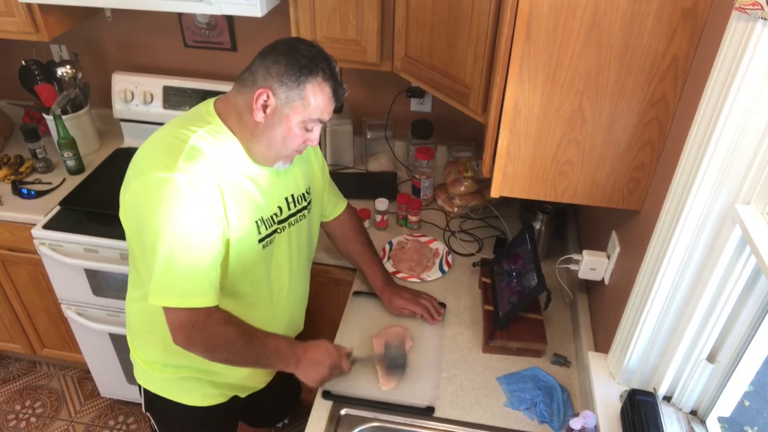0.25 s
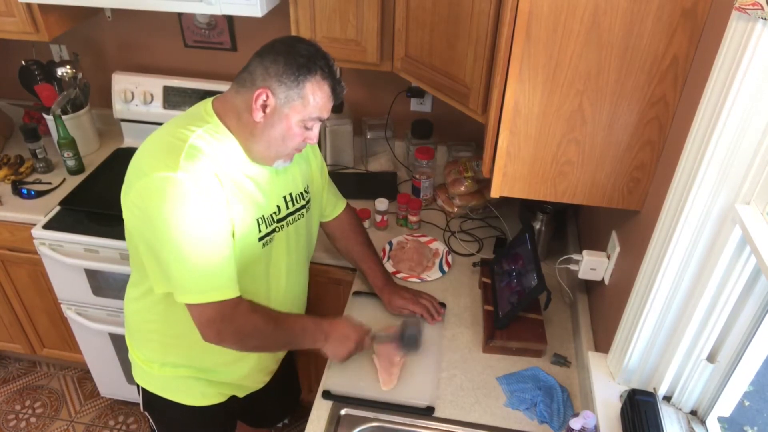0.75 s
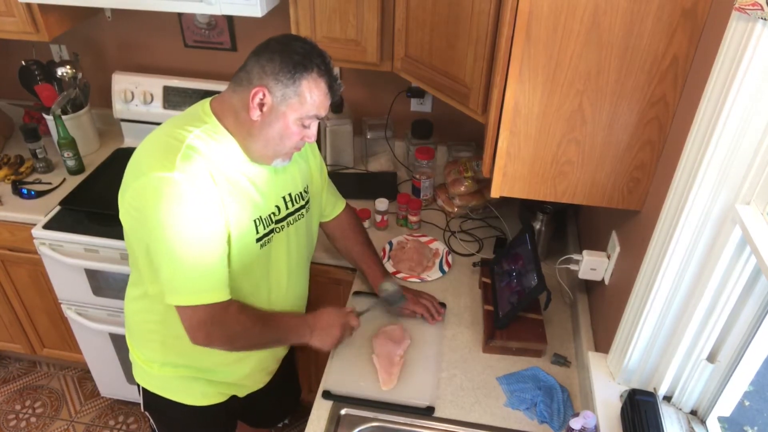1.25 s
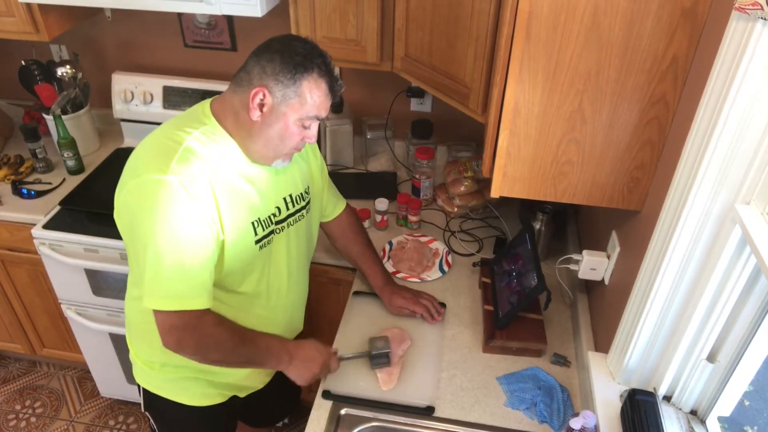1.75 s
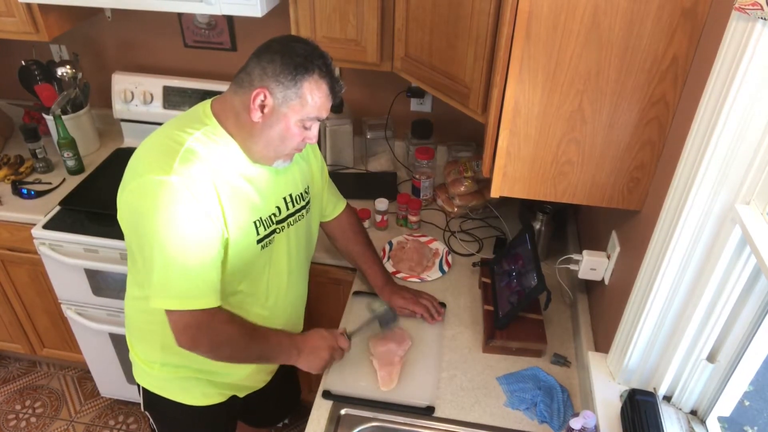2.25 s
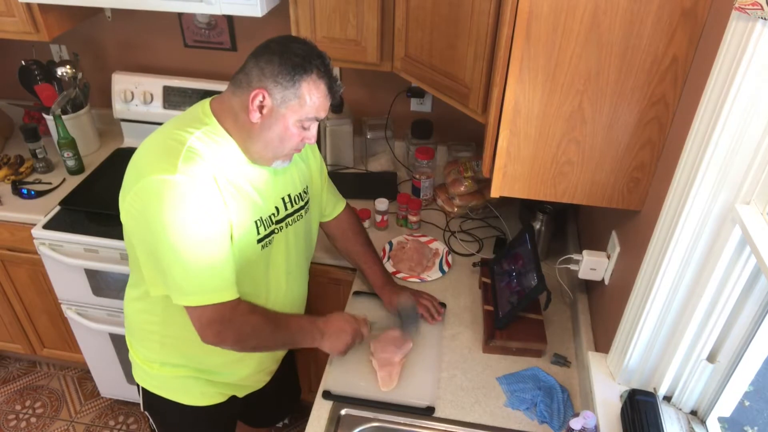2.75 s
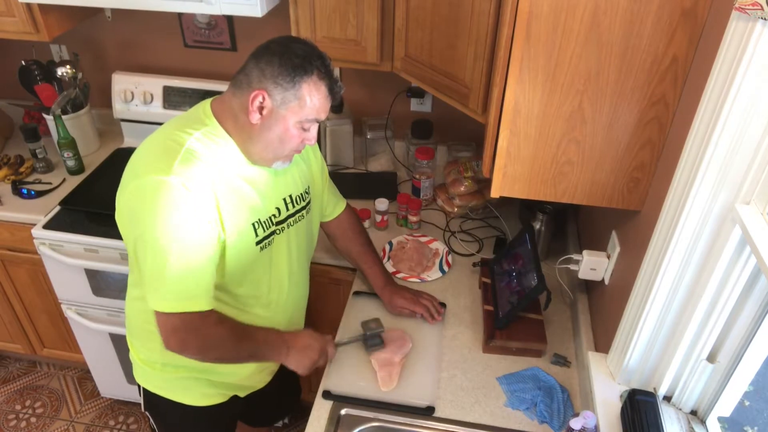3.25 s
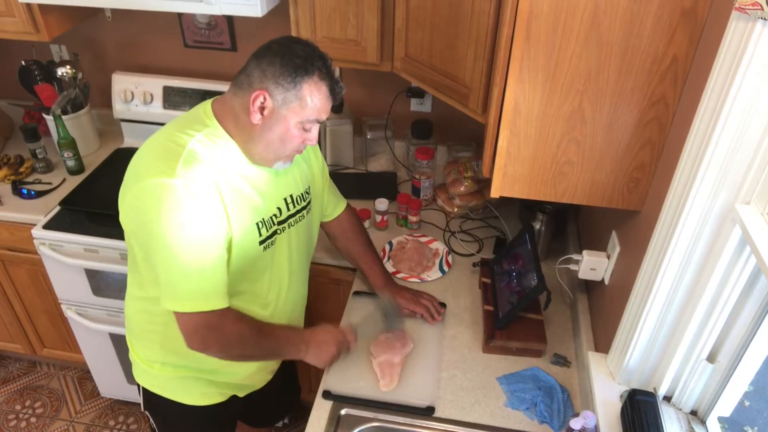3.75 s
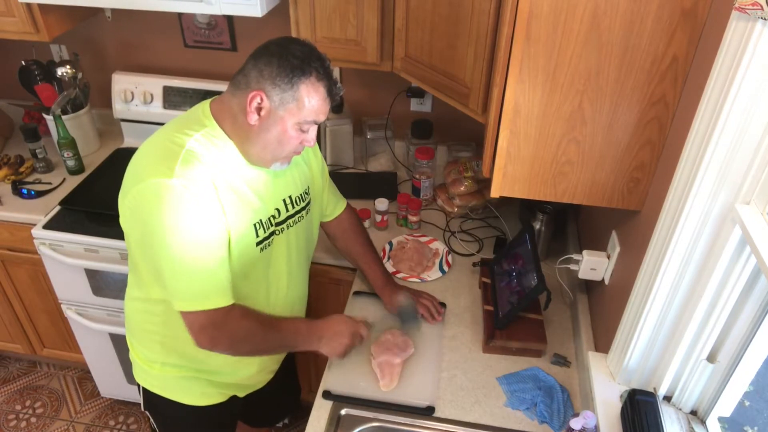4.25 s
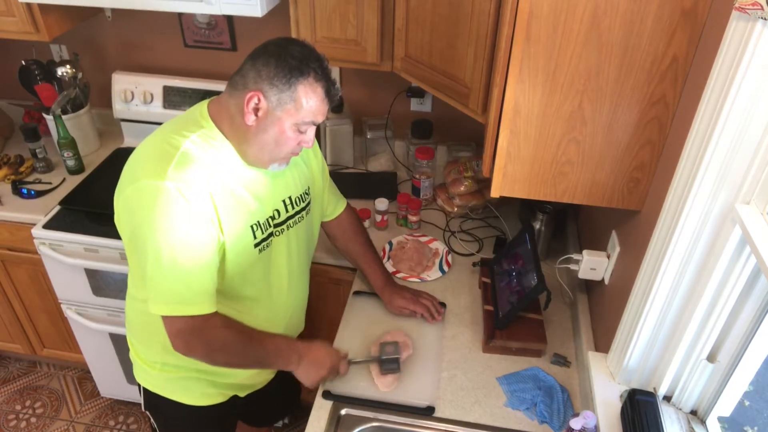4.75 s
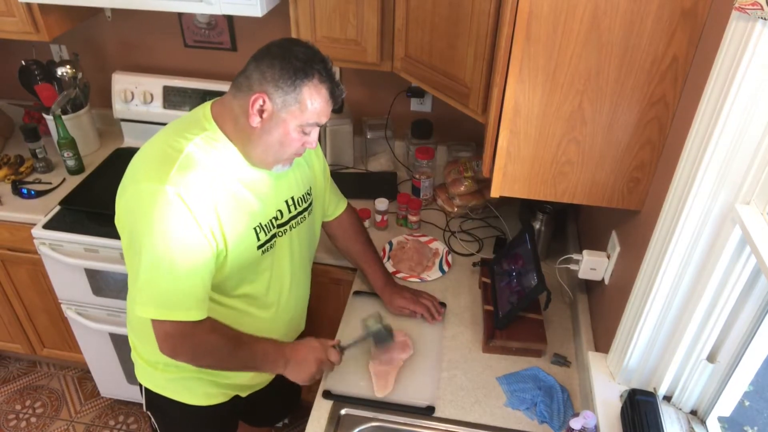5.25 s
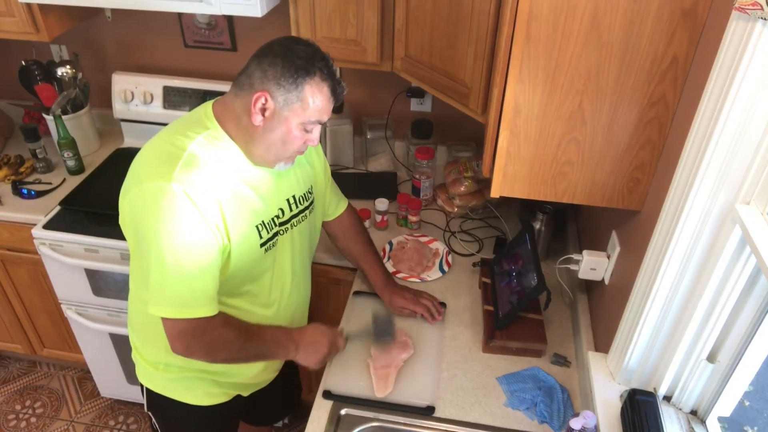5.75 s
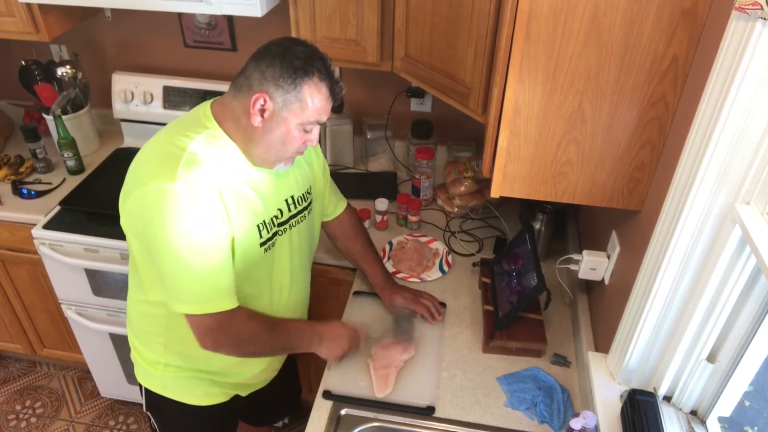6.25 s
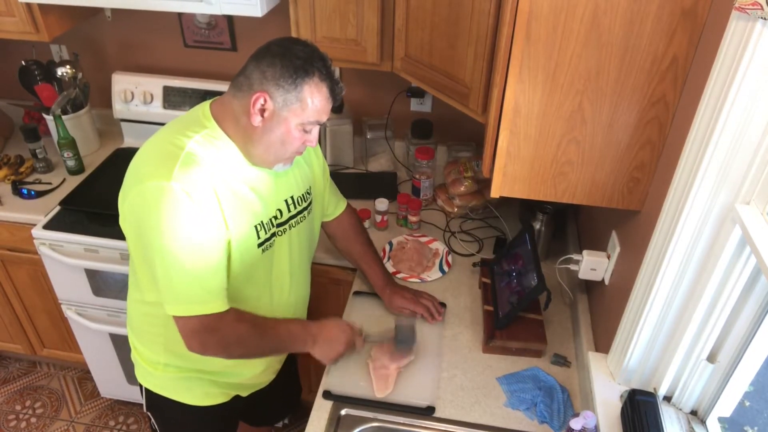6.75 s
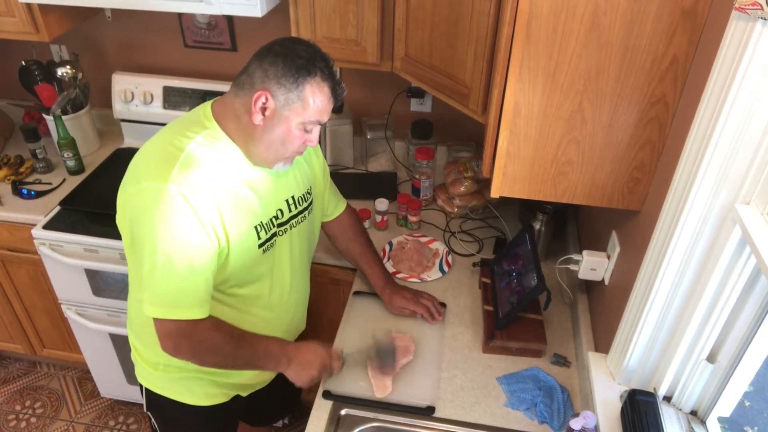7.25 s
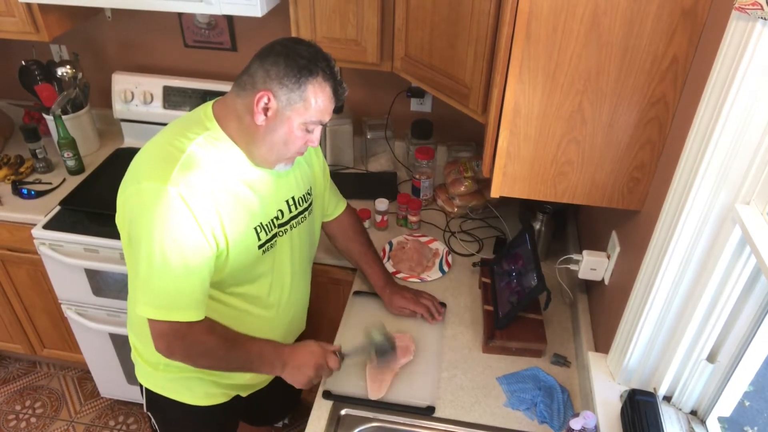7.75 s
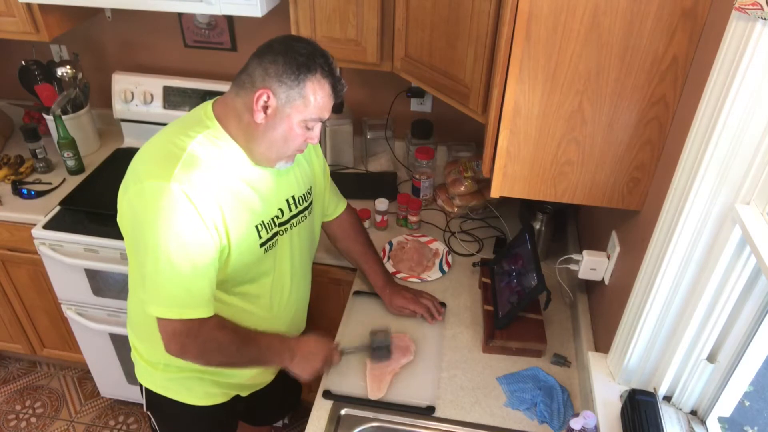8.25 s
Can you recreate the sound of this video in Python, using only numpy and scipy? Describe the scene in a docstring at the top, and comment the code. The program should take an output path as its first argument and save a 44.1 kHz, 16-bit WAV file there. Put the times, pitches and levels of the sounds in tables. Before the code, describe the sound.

A metal mallet pounds raw chicken on a plastic cutting board, about five blows a second without a pause. Each blow joins a brief wet squelch with a sharp slap, a knock from the board and a low thud from the counter and hollow cabinet. The blows vary in wetness and soften a little near the end. The microphone is close, and the small kitchen rings briefly.

```python
"""Pounding chicken in a small kitchen.

Close to the microphone, a metal mallet pounds a chicken breast on a plastic cutting board, about five
blows a second. Each blow squelches as the face meets the wet meat, then slaps home: the board knocks,
the counter thuds and the cabinet under it answers. The room rings briefly after every blow, and the
peaks drive the microphone to its ceiling."""
import sys
import numpy as np
from scipy import signal
from scipy.fft import rfft, irfft, next_fast_len
from scipy.io import wavfile

SR = 44100
rng = np.random.default_rng(int(sys.argv[2]) if len(sys.argv) > 2 else 0)


def wav_record(signal):
    """Record a signal, one row per channel, as 16-bit PCM in the file named by sys.argv[1]."""
    frames = np.transpose(np.atleast_2d(signal))
    bounded = np.clip(frames, -1, 1)
    # unit amplitude maps onto the largest positive 16-bit level
    quanta = np.round(bounded * 32767).astype(np.int16)
    wavfile.write(sys.argv[1], SR, quanta)


N = 374850
SIZE = 32768  # samples in one blow and its tail
T = np.arange(SIZE) / SR


def undb(db):
    """Decibels to gain."""
    return 10 ** (np.asarray(db) / 20)


def fade(t60):
    """Exponential decay that loses 60 dB in t60 seconds."""
    return np.exp(-np.log(1000) * T / t60)


def swell(rise_s):
    """Exponential rise from 0 towards 1."""
    return 1 - np.exp(-T / rise_s)


def unit(x):
    """Scale to unit energy."""
    return x / np.sqrt(np.sum(x ** 2))


def level(x, db):
    """Set the rms of the first 50 ms."""
    return x * undb(db) / np.sqrt(np.mean(x[:SR // 20] ** 2))


def colour(x, spectrum):
    """Minimum-phase filter with the outline (frequency [Hz], level [dB])."""
    size = 2 * next_fast_len(len(x))
    hz, db = np.transpose(spectrum)
    bins = np.maximum(np.fft.rfftfreq(size, 1 / SR), 1)
    gain = undb(np.interp(np.log(bins), np.log(hz), db))
    cepstrum = irfft(np.log(gain))
    cepstrum[1:size // 2] *= 2
    cepstrum[size // 2 + 1:] = 0
    return irfft(rfft(x, size) * np.exp(rfft(cepstrum)))[:len(x)]


def cut(x, hz, kind, order=2):
    """Butterworth low-pass or high-pass."""
    return signal.sosfilt(signal.butter(order, hz, kind, fs=SR, output="sos"), x)


def add(track, s, x):
    """Mix a sound into the track at time s."""
    start = int(round(s * SR))
    a, b = max(start, 0), min(start + len(x), len(track))
    track[a:b] += x[a - start:b - start]


def crackle(grain_db, size=16):
    """Noise in tiny grains of uneven strength, each size samples long."""
    noise = rng.standard_normal(SIZE)
    grains = undb(grain_db * rng.standard_normal(SIZE // size))
    return noise * np.repeat(grains, size)


def ring(modes, scatter_db, detune, gains=1):
    """Struck modes, neighbours in opposite phase; strength and pitch shift from blow to blow."""
    t = T[:SIZE // 2]
    hz, db, t60 = np.transpose(modes)[:, :, None]
    hz = hz * (1 + detune * rng.standard_normal(hz.shape))
    db = db + scatter_db * rng.standard_normal(db.shape)
    waves = undb(db) * np.sin(2 * np.pi * hz * t) * np.exp(-np.log(1000) * t / t60)
    signs = (-1) ** np.arange(len(modes))
    return np.pad((gains * signs) @ waves, (0, SIZE // 2))


# Room tone at the microphone: (frequency [Hz], level [dB])
ROOM_TONE = [(25, 1), (60, 22), (150, -5), (500, -8), (2000, -14), (8000, -36), (16000, -65)]
def room_tone(db=-52):
    """Faint steady hush of the house."""
    hush = colour(rng.standard_normal(N), ROOM_TONE)
    return hush * undb(db) / np.std(hush)


# Reverberation of the small kitchen: (frequency [Hz], t60 [s])
KITCHEN_DECAY = [(100, 0.21), (400, 0.48), (1100, 0.46), (3000, 0.44), (6500, 0.44), (10000, 0.39),
                 (15000, 0.33)]
def kitchen(walls, moving_share=0.64, near_db=-2, late_db=2, dull_hz=11000):
    """Echoes of a click: quick ones off the nearby wall and cupboards, then the diffuse room."""
    near = rng.standard_normal(SIZE) * (rng.random(SIZE) < .15) * fade(t60=.12) * (T > .0015)
    # The walls' pattern is given; clumps of echoes off the moving arm and body are new each time.
    echoes = rfft(walls + moving_share * crackle(grain_db=3, size=128))
    hz, t60 = np.transpose(KITCHEN_DECAY)
    log_bins = np.log(np.maximum(np.fft.rfftfreq(SIZE, 1 / SR), 1))
    bands = [np.interp(log_bins, np.log(hz), share) for share in np.eye(len(hz))]
    late = sum(irfft(echoes * band) * fade(t) for band, t in zip(bands, t60))
    late = cut(unit(late * swell(rise_s=.0072)), dull_hz, "low")
    return undb(near_db) * unit(near) + undb(late_db) * late


def in_room(x, room, room_db):
    """The direct sound together with its echoes."""
    return x + undb(room_db) * signal.fftconvolve(x, room)[:SIZE]


# Standing waves between the kitchen walls: (frequency [Hz], level [dB], t60 [s])
ROOM_MODES = [(51.6, 0.5, 0.3), (72.5, -8, 0.56), (96.3, 4, 0.23), (161.8, -0.5, 0.42), (975, -8.5, 0.41)]
def standing_waves():
    """The room's own notes build up late and linger."""
    return ring(ROOM_MODES, scatter_db=2.5, detune=.01) * swell(rise_s=.036)


# Cabinet panels below the counter: (frequency [Hz], level [dB], t60 [s])
CABINET_MODES = [(312.7, -0.5, 0.16), (345, 8, 0.087), (384, -8.5, 0.27), (424.2, -8, 0.21),
                 (440.4, -6.5, 0.19), (459.4, -3.5, 0.23), (539, -10, 0.25), (586.6, -0.5, 0.13),
                 (695, 9.5, 0.064), (734, -7.5, 0.22)]
def cabinet():
    """A blow shakes the hollow cabinet, which takes a moment to answer."""
    return ring(CABINET_MODES, scatter_db=3, detune=.028) * swell(rise_s=.039)


# Counter top under the board: (frequency [Hz], level [dB], t60 [s])
COUNTER_MODES = [(68.5, -10, 0.25), (87.5, 3, 0.059), (122.5, 0, 0.17), (160, 3.5, 0.06),
                 (200.5, -3.5, 0.56), (240, -0.5, .10), (279.8, -8, 0.17)]
def counter_thud(room, press_s=0.06, release_s=0.017, lifted_db=-15):
    """The counter booms while the mallet bears on it, and quietens as the mallet lifts."""
    lifted = np.clip((T - press_s) / release_s, 0, 1)
    boom = ring(COUNTER_MODES, scatter_db=1.5, detune=.011) * swell(rise_s=.0025)
    return in_room(boom * undb(lifted_db * lifted), room, room_db=-11)


# Cutting board and mallet, close up: (frequency [Hz], level [dB], t60 [s])
BOARD_MODES = [(873, -5.5, 0.21), (1070, -17, 0.027), (1050.6, -3, 0.23), (1097, -0.5, 0.11),
               (1203, -0.5, 0.07), (1348, 1, 0.026), (1447, 1, 0.13), (1500, 1, 0.037), (1608, -11, 0.13),
               (1760, -20, 0.42)]
def board_knock(room, centre_hz, spread_hz=280, echo_s=.008, echo_db=-3):
    """Where the mallet lands picks the board's modes, and the meat damps them."""
    mode_hz = np.transpose(BOARD_MODES)[0]
    gains = 1 / (1 + ((mode_hz - centre_hz) / spread_hz) ** 2)
    board = ring(BOARD_MODES, scatter_db=2, detune=.012, gains=gains) * fade(t60=.085)
    out = in_room(board, room, room_db=-15)
    add(out, echo_s * rng.uniform(.7, 1.3), undb(echo_db) * board)  # off the cupboard overhead
    return out


# Wet meat, close up: (frequency [Hz], level [dB])
SQUELCH_SPECTRUM = [(300, 10), (1500, 8.5), (4000, 9), (7000, 10.5), (10400, -2.5), (13000, 2), (16000, -3)]
def squelch(sink_s, after_s=.002, touch_db=-6, room_db=-11):
    """Wet crackle that grows while the mallet's teeth sink in and dies once they bottom out."""
    sunk = np.minimum(T / sink_s, 1)
    squeeze = undb(touch_db * (1 - sunk)) * np.exp(-np.maximum(T - sink_s, 0) / after_s)
    # The squelch trails off in a faint, diffuse wash of room echo.
    echoes = kitchen(rng.standard_normal(SIZE)) * sunk ** 2
    juice = unit(crackle(grain_db=2.5) * squeeze)
    x = colour(juice + undb(room_db) * echoes, SQUELCH_SPECTRUM)
    return x / np.sqrt(np.mean(x[T < sink_s + after_s] ** 2))


# The slap at the microphone: (frequency [Hz], level [dB])
SLAP_SPECTRUM = [(60, -24), (250, 0.5), (420, 3.5), (600, -2), (850, 3.5), (1100, 6), (1500, 3.5),
                 (2100, -2), (4000, -3.5), (5000, -7), (6700, -9), (8500, -18.5), (10400, -23.5),
                 (12500, -19), (15500, -20.5)]
def slap(room, lowest_hz=650, room_db=-3):
    """Air and juice burst from under the teeth: a grainy crack that gets its body from the room."""
    burst = crackle(grain_db=1) * fade(t60=.067) * swell(rise_s=.00057)
    crack = cut(burst, lowest_hz, "high")
    return colour(unit(crack) + undb(room_db) * room, SLAP_SPECTRUM)


# Wetness of the meat as the mallet wanders over the breast: (time [s], level [dB])
WETNESS = [(0, -10.5), (.35, -18), (.65, 0.5), (1.1, -3.5), (1.4, 6.5), (1.65, -5.5), (2.1, -2),
           (3.1, -0.5), (3.45, -6), (3.9, 1), (4.4, -2), (5.1, -8), (5.65, 1.5), (6.9, -1), (7.55, -17),
           (7.9, -3), (8.2, 4)]
# The counter's boom as the mallet works across the board: (time [s], level [dB])
BOOM = [(0, 0), (.45, 3), (1.1, 0), (2.4, -.5), (3.9, -1), (4.4, 1), (5.05, 2.5), (5.4, -1), (6.1, -1),
        (6.75, 3.5), (7.2, 1), (8.4, 0)]
# Mallet strokes: (landing time [s], force [dB], knock level relative to the blow [dB], knock centre [Hz])
STROKES = [(-0.085, -3.5, 9, 1190), (0.085, -2, 5.5, 1145), (0.2522, 1.5, 3, 1220), (0.4157, 1.5, 0, 1350),
           (0.577, 0.5, -0.5, 1240), (0.752, 2, -0.5, 1120), (0.961, 0.5, -0.5, 1410), (1.1788, 1, 3, 1260),
           (1.383, -1, 5.5, 1170), (1.5898, 2, -0.5, 1050), (1.7882, -1.5, 1, 1140), (1.98, 0, 5.5, 1190),
           (2.1715, -0.5, 0.5, 1220), (2.351, -2.5, 2, 1230), (2.532, 3, -0.5, 1160),
           (2.7271, 3.5, -3.5, 1370), (2.9121, 0.5, -6, 1210), (3.0993, 1.5, 0.0, 1200),
           (3.285, 2, 0, 1300), (3.4679, 0.5, 5, 1280), (3.6577, -1.5, -2.5, 1220),
           (3.8389, 2.5, 0.5, 1230), (4.0277, 3.5, -2, 1240), (4.2216, 3.5, -3.5, 1110),
           (4.4162, 0, 4, 1090), (4.608, -1, -0.5, 1100), (4.8, 1, 4, 1380), (4.997, -2.5, 5, 1390),
           (5.1945, -1, 2, 1210), (5.382, -1, -0.5, 1160), (5.5709, 0.5, -2, 1290), (5.749, 2, -2.5, 1080),
           (5.9374, -0.5, -18, 1250), (6.1237, 1.5, 3, 1240), (6.3326, 2.5, 3, 1070),
           (6.5385, -1.5, -15, 1140), (6.7375, 1, -5, 1450), (6.9433, -0.5, 1.5, 1320),
           (7.1443, -3.5, 2.0, 1390), (7.3351, -1.5, 0.5, 1260), (7.5318, -7.5, -1, 1220),
           (7.7172, -4, -3, 1250), (7.9132, -2.5, 4, 1350), (8.0937, -3, -1, 1400), (8.2768, -1, 0, 1160),
           (8.4582, -5.5, -0.5, 1240)]
def pounding(base_db=-18, squelch_db=3, slap_db=2, knock_db=-2.94, thud_db=-2, cabinet_db=-8,
             standing_db=-13, base_sink_s=.0028):
    """Each stroke's force drives a squelch, then slap, knock and thud together, then cabinet and room."""
    out, walls = np.zeros(N), rng.standard_normal(SIZE)
    for s, force_db, knock_offset_db, centre_hz in STROKES:
        room = kitchen(walls)
        wet_db = np.interp(s, *np.transpose(WETNESS))
        sink_s = base_sink_s * np.exp(.15 * rng.standard_normal())
        sink_s *= undb(.3 * wet_db - force_db)  # wet meat is softer; a faster mallet sinks in sooner
        blow_db = base_db + force_db
        counter_db = base_db + .31 * force_db + np.interp(s, *np.transpose(BOOM))
        panels_db = base_db + .82 * force_db
        add(out, s - sink_s, squelch(sink_s) * undb(blow_db + wet_db + squelch_db))
        add(out, s, level(slap(room), blow_db + slap_db))
        add(out, s, level(board_knock(room, centre_hz), blow_db + knock_offset_db + knock_db))
        add(out, s, level(counter_thud(room), counter_db + thud_db))
        add(out, s, level(cabinet(), panels_db + cabinet_db))
        add(out, s, level(standing_waves(), counter_db + standing_db))
    return out


def scene():
    """The pounding over the quiet kitchen, in mono from beside the board."""
    return (pounding() + room_tone())[None]


def record(dry):
    """The close microphone drops the deepest bass, rounds off the peaks and cuts the top."""
    bass_hz, ceiling, top_hz = 30, .92, 15900
    x = cut(dry, bass_hz, "high", order=4)
    x = x / (1 + (x / ceiling) ** 6) ** (1 / 6)
    return signal.sosfilt(signal.ellip(8, .2, 70, top_hz, fs=SR, output="sos"), x)


dry = scene()
out = record(dry)
wav_record(out)
```